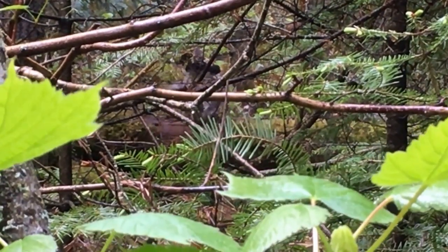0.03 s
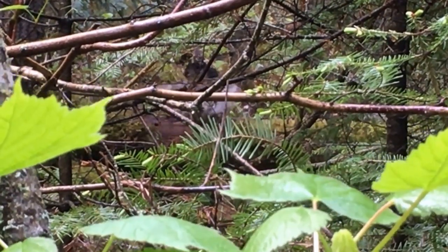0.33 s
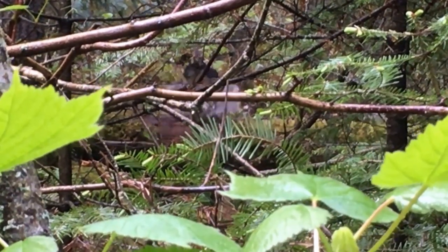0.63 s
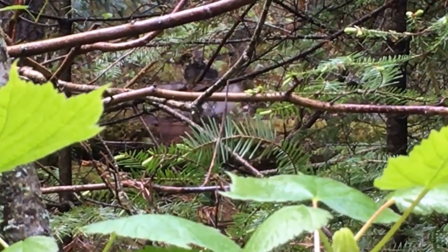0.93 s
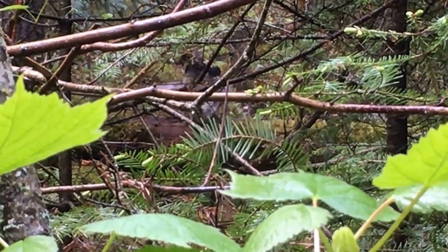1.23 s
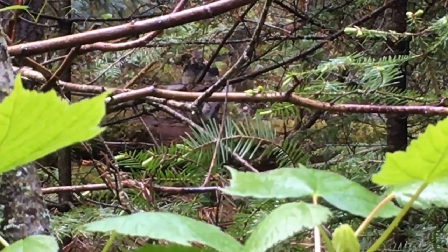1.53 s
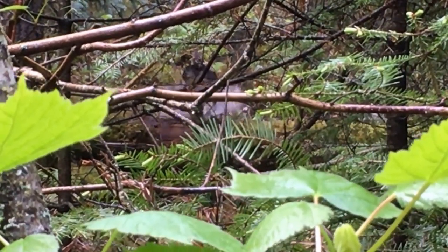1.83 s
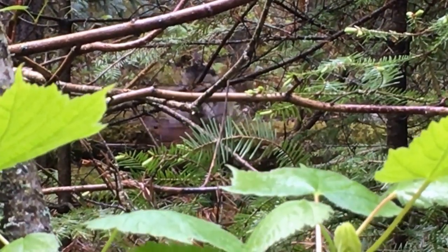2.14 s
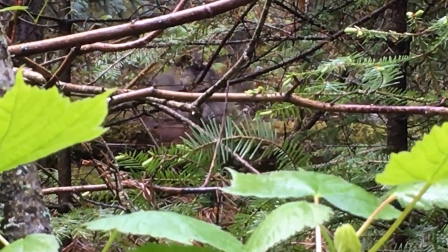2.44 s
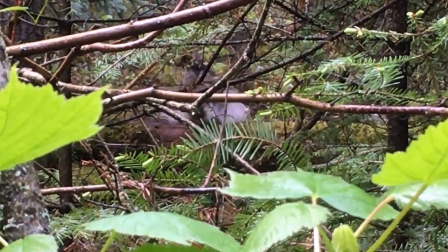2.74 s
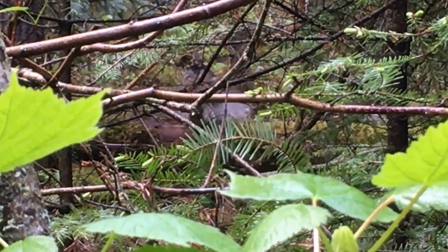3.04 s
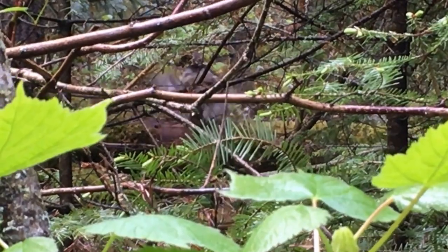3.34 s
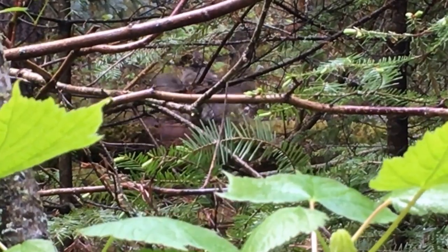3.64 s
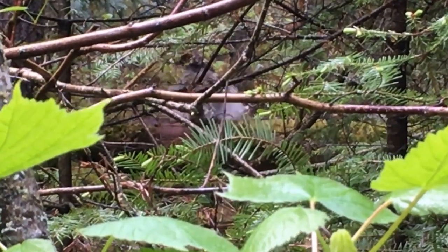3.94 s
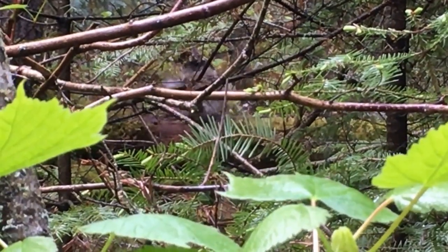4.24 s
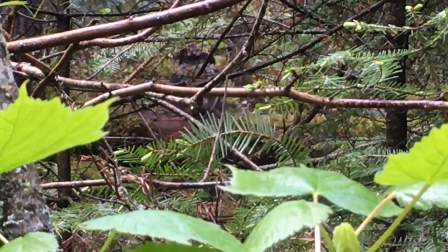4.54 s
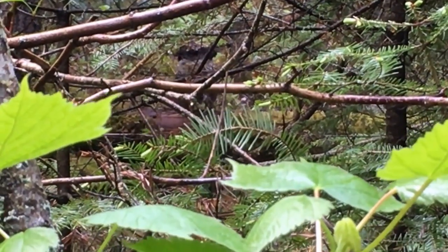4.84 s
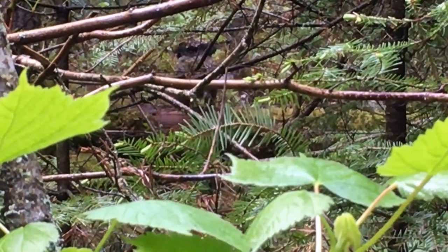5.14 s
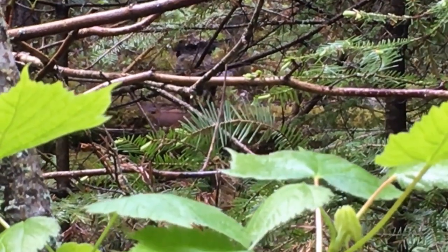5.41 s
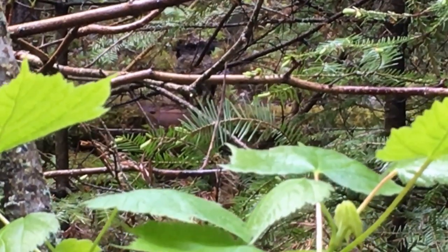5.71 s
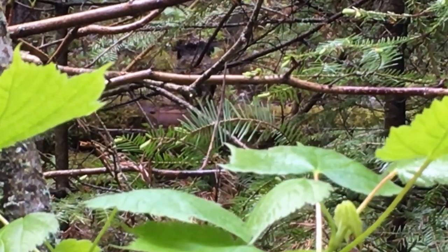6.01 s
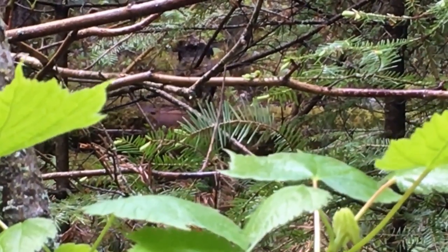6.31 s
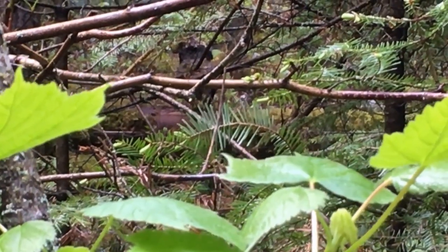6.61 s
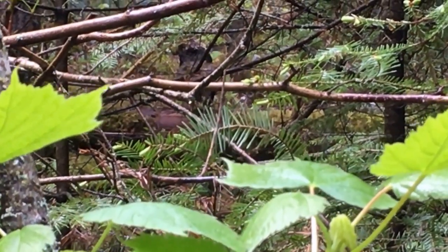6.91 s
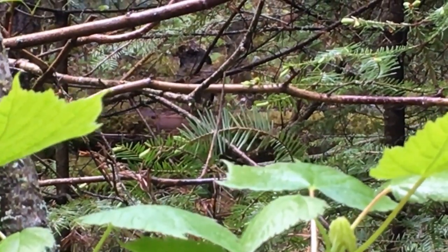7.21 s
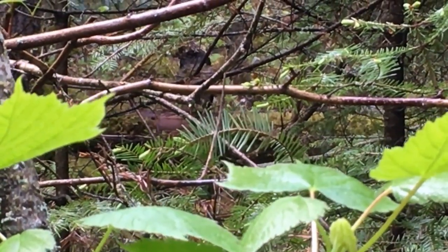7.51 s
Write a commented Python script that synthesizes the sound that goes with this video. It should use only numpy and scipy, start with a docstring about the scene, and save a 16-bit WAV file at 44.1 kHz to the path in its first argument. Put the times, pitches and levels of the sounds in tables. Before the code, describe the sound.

Low wing thumps from a drumming grouse quicken to a roll with light feather rustle, then stop in a quiet wood.

```python
"""A quiet conifer wood, where a ruffed grouse drums on a log: wing beats speed up to a flutter and
slow again. Each stroke shoves the air into a deep thump that trunks and ground throw back, while the
feathers swish, rustle and tick. A faint, even forest hiss lies behind, and the small microphone
rings at its bass cut-off."""
import sys
import numpy as np
from scipy import signal
from scipy.fft import rfft, irfft
from scipy.io import wavfile

SR = 44100
rng = np.random.default_rng(int(sys.argv[2]) if len(sys.argv) > 2 else 0)


def inscribe(sig):
    """Save sig as 16-bit PCM at rate SR to the path in sys.argv[1].

    A 1-D sig is mono; a 2-D sig holds one channel per row.
    Samples are clipped to [-1, 1] before scaling.
    """
    pcm = np.round(np.clip(np.atleast_2d(sig).T, -1, 1) * 32767)
    wavfile.write(sys.argv[1], SR, pcm.astype(np.int16))


N = 333396
T = np.arange(N) / SR

# Wing beats, each gap about a tenth shorter than the last until the roll peaks and slackens.
# Each row: time in seconds, air push in dB, feather swish in dB.
BEATS = [(0.0774, -4.5, -38.5), (0.4281, -4.5, -38), (0.7463, -5.2, -37.5), (1.0332, -5, -36.5),
         (1.293, -6.5, -37), (1.5278, -6.1, -37), (1.7416, -6.5, -35), (1.9378, -6, -34.5),
         (2.1182, -7, -38.5), (2.2834, -7.5, -36), (2.4363, -7.1, -36.5), (2.5782, -7, -35.5),
         (2.7105, -7.5, -36), (2.834, -6.5, -36.5), (2.9486, -7.5, -40), (3.0533, -8.1, -38),
         (3.1514, -7.5, -37), (3.2434, -10, -37.5), (3.3287, -9.7, -36.5), (3.4065, -8.5, -41),
         (3.477, -8, -36.5), (3.5415, -7.5, -38), (3.5989, -11, -39), (3.6565, -8, -39.5),
         (3.7201, -12, -40), (3.789, -11, -41.5), (3.8638, -10, -40.5), (3.9472, -8.5, -43),
         (4.0379, -10.6, -43), (4.1378, -8.5, -44.5), (4.2467, -11, -42.5), (4.3637, -11.5, -42.5),
         (4.4922, -12, -43)]


def undb(db):
    """Decibels to gain."""
    return 10 ** (np.asarray(db) / 20)


def unit(x):
    """Scale to rms 1."""
    return x / np.sqrt(np.mean(x ** 2))


def wander(turns_per_s):
    """A random drift with a spread near 1."""
    return np.interp(T * turns_per_s, np.arange(N), rng.standard_normal(N))


def noise(colour):
    """Noise of rms 1, coloured by a curve of (Hz, dB) points."""
    hz, db = np.transpose(colour)
    log_hz = np.log(np.maximum(np.arange(N // 2 + 1) * SR / N, 1))
    return unit(irfft(rfft(rng.standard_normal(N)) * undb(np.interp(log_hz, np.log(hz), db)), N))


def patchy_noise(colour, treble_db, patchy_db):
    """A quarter second of noise with chance peaks of colour: feathers never lie the same way twice."""
    hz, db = np.transpose(colour)
    size = SR // 4
    log_hz = np.log(np.maximum(np.arange(size // 2 + 1) * SR / size, 1))
    knots = np.log(np.geomspace(200, 16000, 28))
    shelf = np.interp(log_hz, np.log([1200, 3500]), [0, treble_db])
    patches = patchy_db * np.interp(log_hz, knots, rng.standard_normal(len(knots)))
    curve_db = np.interp(log_hz, np.log(hz), db) + shelf + patches
    return unit(irfft(rfft(rng.standard_normal(size)) * undb(curve_db), size))


def bursts(times, dbs, colour, rise_s, hold_s, fall_s, patchy_db, treble_db=0):
    """Bursts of noise that swell up to each time, hold and die away."""
    out = np.zeros(N)
    for at, db, treble in np.broadcast(times, dbs, treble_db):
        grain = patchy_noise(colour, treble, patchy_db)
        span = max(int(at * SR) - len(grain) // 4, 0) + np.arange(len(grain))
        age = T[span] - at
        envelope = np.exp(np.minimum(0, np.minimum(age / rise_s, (hold_s - age) / fall_s)))
        out[span] += undb(db) * grain * envelope
    return out


def forest():
    """A low wash of distant air in the trees that wavers a little, and a smooth hiss above it."""
    # Colours of the dark wash and the bright hiss. Each row: frequency in Hz, level in dB.
    wash_colour = [(15, -28), (25, -8), (42, -4.5), (59, 3.5), (134, -4.5), (355, -5), (447, -10.5),
                   (595, -8), (655, -9), (1160, -10.5), (1380, -13.5), (1870, -14.5), (2400, -17.5),
                   (3120, -26), (5280, -120)]
    hiss_colour = [(1500, -19), (2400, -4.5), (2900, 0), (3300, 2.5), (4300, 2), (4900, -2), (5500, 0),
                   (6600, -3), (7500, -6.5), (9500, -7), (10500, -13.5), (12000, -10.5), (15500, -16)]
    wash = noise(wash_colour) * undb(-55 + .5 * wander(5.9))
    hiss = noise(hiss_colour) * undb(-62 + .022 * wander(1.1))
    return wash + hiss


def scatter(x, wet_db, t60_s, build_s):
    """Countless small reflections add a diffuse tail."""
    age = T[:SR]
    tail = rng.standard_normal(SR) * undb(-60 * age / t60_s) * (1 - np.exp(-age / build_s))
    return x + undb(wet_db) * signal.fftconvolve(x, tail / np.linalg.norm(tail))[:N]


def trunk_echoes(x):
    """The same few echoes follow every thump, because the bird stays in one place."""
    # Bounces off ground and trunks. Each row: delay in seconds, signed share of the pressure.
    echoes = [(0.0203, 0.172), (0.0299, -0.06), (0.0344, -0.115), (0.0461, 0.029), (0.0558, 0.025),
              (0.0701, -0.027), (0.093, 0.016), (0.1235, -0.007), (0.1427, 0.005), (0.1534, 0.015),
              (0.1813, 0.004), (0.2149, -0.006)]
    return x + sum(share * np.interp(T - delay, T, x, left=0) for delay, share in echoes)


def upper_bass_dip(x, hz=203, width_hz=45, depth=.16):
    """A gentle dip near 200 Hz keeps the thump round."""
    b, a = signal.iirpeak(hz, hz / width_hz, fs=SR)
    return x - depth * signal.lfilter(b, a, x)


def mic_bass_cut(x):
    """The microphone rings at its cut-off, turning a single push into two or three deep swings."""
    # Resonant high-passes. Each row: frequency in Hz, width in Hz.
    resonances = [(28.5, 21.4), (69, 25.3)]
    for hz, width in resonances:
        b, a = signal.bilinear([1, 0, 0], [1, 2 * np.pi * width, (2 * np.pi * hz) ** 2], SR)
        x = signal.lfilter(b, a, x)
    return x


def wing_fold(full_fold_s=.2):
    """How far the wing folds after each beat, 0 to 1: only long gaps let it close against the body."""
    gaps = np.gradient(np.transpose(BEATS)[0])
    return np.clip(gaps / full_fold_s, 0, 1)


def flicks(at, click_db, ring_db):
    """Dry quill clicks, each with a brief ring of the hollow feather shaft."""
    # Colours of the broad click and the narrow ring. Each row: frequency in Hz, level in dB.
    click_colour = [(300, 5), (1000, -12), (2300, -4), (3600, -9), (5000, -11), (9000, -6.5), (11000, -10),
                    (15500, -8)]
    shaft_colour = [(1500, -15), (2700, 3), (3300, 13), (4000, -10), (6000, -31)]
    click = bursts(at, click_db, click_colour, rise_s=.0003, hold_s=.0004, fall_s=.0016, patchy_db=3)
    ring = bursts(at, ring_db, shaft_colour, rise_s=.0003, hold_s=.0005, fall_s=.002, patchy_db=2)
    return click + ring


def quills(unfolded_db=-28, spread_db=1.5):
    """A few louder clicks, and clicks of the folding wing that fade as the beats quicken."""
    # The louder quill clicks, most just after a wing beat.
    # Each row: time in seconds, click in dB, shaft ring in dB.
    loud_clicks = [(2.099, -48, -54), (2.616, -45, -53), (2.7277, -41, -52), (3.5122, -46, -40),
                   (3.5742, -46, -46), (3.6318, -43, -46), (3.673, -42, -52), (3.6795, -44, -48),
                   (3.6913, -43, -47)]
    # The wing folds shut, then settles more faintly.
    # Each row: delay after the beat in seconds, click and shaft ring in dB relative to the swish.
    fold_clicks = [(.0178, -4.5, -16), (.038, -17, -18)]
    at, _, swish_db = np.transpose(BEATS)
    out = flicks(*np.transpose(loud_clicks))
    for delay, click_db, ring_db in fold_clicks:
        force_db = swish_db + unfolded_db * (1 - wing_fold()) + spread_db * rng.standard_normal(len(at))
        out += flicks(at + delay, click_db + force_db, ring_db + force_db)
    return out


def ruffle(fastest_db=-50.5, db_per_octave=26, lag_s=.045):
    """The faster the wings beat, the more the plumage ruffles; it stops just after the last beat."""
    # Colour of the ruffling plumage. Each row: frequency in Hz, level in dB.
    colour = [(200, -14), (550, 4), (1050, 2.5), (1900, -0.5), (2800, -15), (3600, -5.5), (6000, -9),
              (9400, -12), (10500, -16), (15500, -18)]
    at = np.transpose(BEATS)[0]
    rate = 1 / np.gradient(at)
    beat_gain = undb(fastest_db + db_per_octave * np.log2(rate / rate.max()))
    envelope = np.interp(T - lag_s, at, beat_gain, left=0, right=0)
    return envelope * undb(2 * wander(200)) * noise(colour)


def feathers():
    """A crisp swish as each stroke bites the air, amid a looser rustle as the wing swings out and back."""
    # Colours of the swish and the rustle. Each row: frequency in Hz, level in dB.
    swish_colour = [(120, -12), (200, 15.5), (290, 10.5), (450, -2), (650, 5.5), (1000, 3), (1450, -3),
                    (1900, -3.5), (2900, -16.5), (3700, -9), (4800, -16), (5800, -13.5), (9500, -20.5),
                    (10500, -22), (15500, -22)]
    rustle_colour = [(150, 12), (500, -3), (1000, 2), (1800, -7.5), (2800, -8), (3600, -4), (4900, -10.5),
                     (5500, -8), (7500, -14), (9400, -7.5), (10500, -19.5), (13000, -15.5), (15500, -39)]
    at, _, swish_db = np.transpose(BEATS)
    bite = at - .0055  # early in the push, where the wing is fastest
    thin_db = .77 * (swish_db.max() - swish_db)  # a weaker swish loses more body than treble
    fold = wing_fold()
    swish = bursts(bite, swish_db, swish_colour,
                   rise_s=.0016, hold_s=.003, fall_s=.0049, patchy_db=2.2, treble_db=thin_db)
    rustle = bursts(bite + .013, swish_db - 10 + 3 * fold, rustle_colour,
                    rise_s=.016, hold_s=.0011, fall_s=.018, patchy_db=3, treble_db=3.1 * fold - 5)
    air_noise = swish + rustle + ruffle()
    grain = unit(undb(2 * wander(1500)))  # the vanes catch and slip
    return grain * air_noise


def push(peak_s, length_s):
    """One bell-shaped hump of air pressure, as sample positions and values."""
    span = np.arange(max(int((peak_s - length_s / 2) * SR), 0), int((peak_s + length_s / 2) * SR) + 1)
    return span, np.cos(np.pi * (T[span] - peak_s) / length_s) ** 4


def thumps(windup_share=.12, windup_lead_s=.011, windup_s=.026, shove_s=.014, stretch_s_per_db=.0001):
    """Each beat: a soft wind-up of the wings, then the hard shove of air; a softer shove lasts longer."""
    air = np.zeros(N)
    hardest_db = max(db for _, db, _ in BEATS)
    for at, db, _ in BEATS:
        span, windup = push(at - windup_lead_s, windup_s)
        air[span] += windup_share * undb(db) * windup
        span, shove = push(at, shove_s + stretch_s_per_db * (hardest_db - db))
        air[span] += undb(db) * shove
    return air


def scene():
    """Thumps roll away through far trees, twigs and needles scatter the feather noise, the wood hisses."""
    drum = mic_bass_cut(upper_bass_dip(trunk_echoes(thumps())))
    drum = scatter(drum, wet_db=-35.5, t60_s=.97, build_s=.16)
    wings = scatter(feathers() + quills(), wet_db=-14, t60_s=.35, build_s=.008)
    return (drum + wings + forest())[None]


def record(dry, top_hz=15350):
    """The recorder cuts the top treble steeply."""
    return signal.sosfilt(signal.ellip(10, .1, 80, top_hz, fs=SR, output="sos"), dry)


dry = scene()
out = record(dry)
inscribe(out)
```